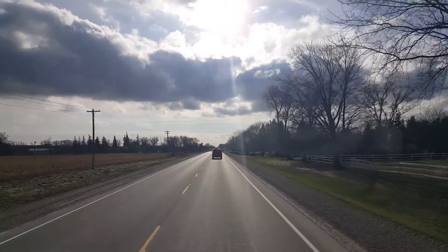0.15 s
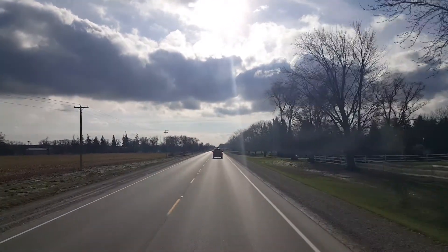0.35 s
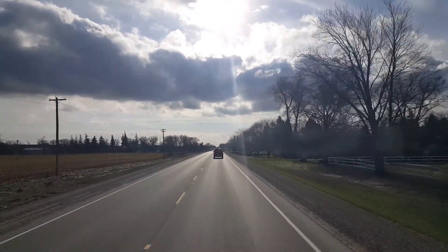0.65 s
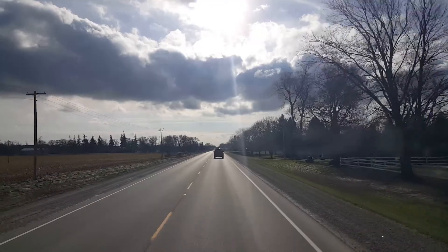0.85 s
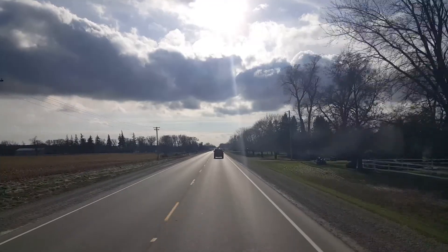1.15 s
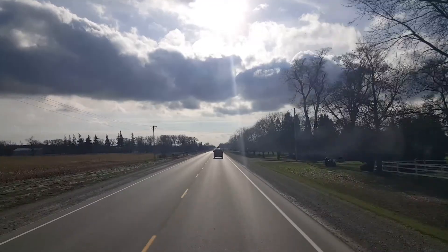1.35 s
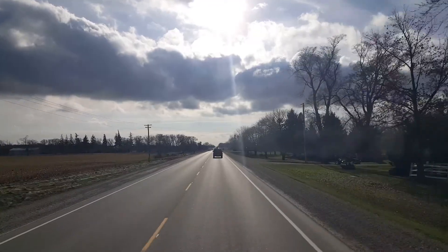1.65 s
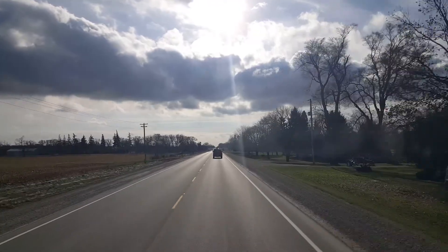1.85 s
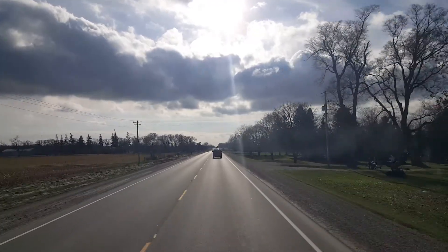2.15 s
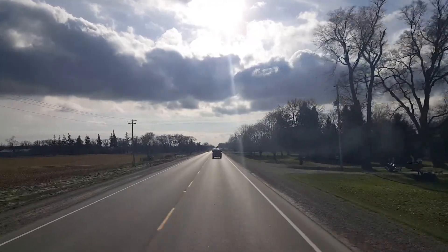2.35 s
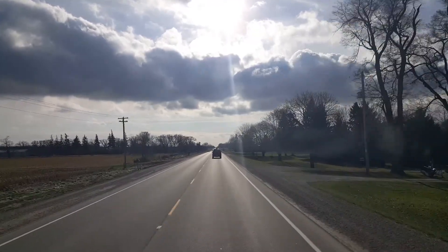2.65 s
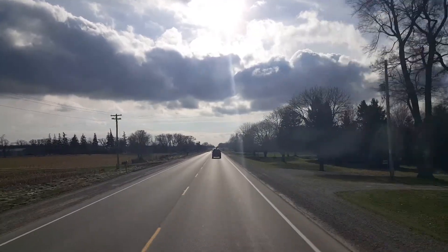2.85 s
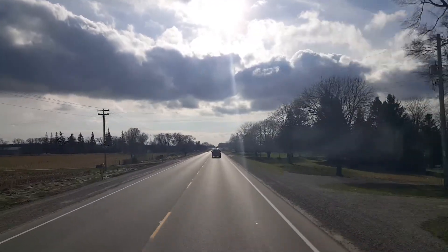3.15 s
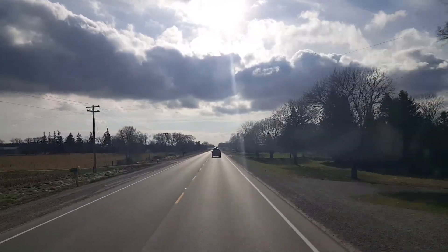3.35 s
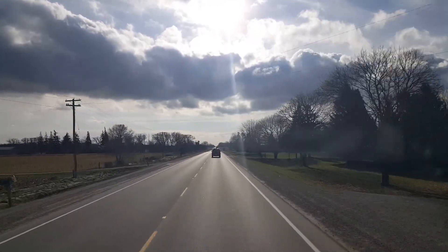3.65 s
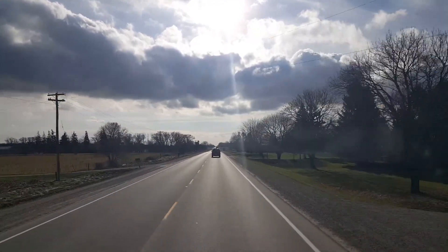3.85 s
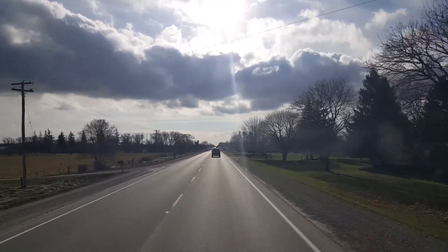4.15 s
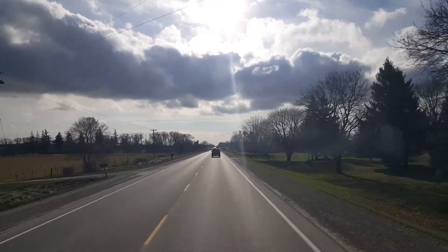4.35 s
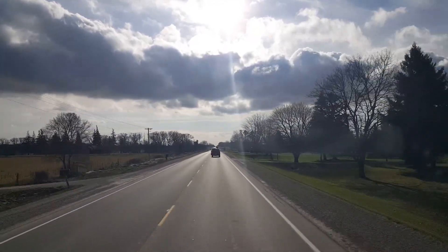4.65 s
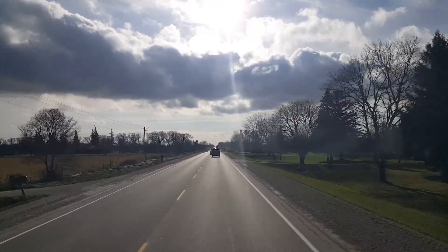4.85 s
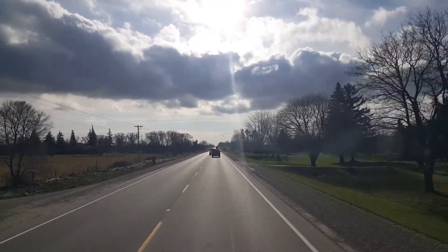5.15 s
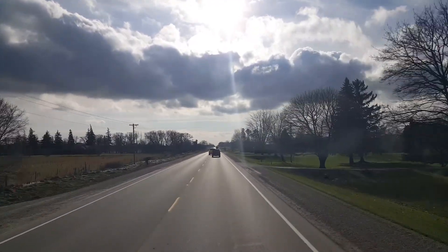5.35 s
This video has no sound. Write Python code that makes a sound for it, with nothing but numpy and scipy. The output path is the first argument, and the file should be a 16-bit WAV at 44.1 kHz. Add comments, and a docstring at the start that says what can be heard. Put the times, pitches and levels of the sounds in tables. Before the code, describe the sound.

Low booming diesel engine heard from the cab, with knock, hiss and tyre rumble; the throttle lifts midway and presses again near the end.

```python
"""One first hears the booming firing tone of a six-cylinder diesel pulling at low revs in a heavy truck's cab.
The driver lifts off for two seconds and presses on again; tone, knock and hiss sink and return with the pull.
Periodic sources are sums of sines locked to the crankshaft or gliding in pitch; combustion, tyre rumble and
panels are shaped noise. A faint turbocharger whistle and ticks of the trim lie over it.
Two microphones a hand apart hear a sound field whose likeness depends on frequency."""
import sys
import numpy as np
from scipy import signal
from scipy.fft import rfft, irfft, next_fast_len
from scipy.io import wavfile
from scipy.ndimage import map_coordinates

SR = 44100
rng = np.random.default_rng(int(sys.argv[2]) if len(sys.argv) > 2 else 0)


def generate_wav(sig):
    """Save sig (samples, or channels by samples) to the path in sys.argv[1] as 16-bit PCM at SR."""
    pcm = np.round(np.clip(np.atleast_2d(sig).T, -1, 1) * 32767).astype(np.int16)
    wavfile.write(sys.argv[1], SR, pcm)


N = 243431

# Level columns are nominal: the functions add swings and random wobble. A half_length_s runs from peak to 1/e.
# Crankshaft and pull: start_s, firing_rate_hz, load_db (below full pull)
CRANKSHAFT = [(0, 55.22, 1), (.9, 55.44, -2.5), (1.6, 55.62, -1), (2.3, 55.77, -1), (2.85, 55.78, -2.5),
              (3.05, 55.1, -7.5), (3.25, 55.09, -13.5), (4.1, 55.03, -10), (4.3, 55.05, -3.5),
              (4.75, 54.85, -12), (4.9, 55.05, -1), (5.52, 55, -2.5)]
# Multiples of the four-stroke cycle that stand out: order (6 = firing rate)
CYCLE_ORDERS = [3, 7, 8, 9, 10, 11, 13, 14, 21, 24, 27, 29, 30, 32, 33, 36, 39, 42, 44, 48, 51, 54, 57, 58,
                60, 63, 66, 69, 72, 74, 75, 78, 87, 90, 93, 96, 99, 105, 108, 114, 123, 126, 129, 147]
# Their strengths at full pull: level_db
CYCLE_ORDER_LEVELS = [-49, -32, -36, -26, -34, -31, -37, -36, -42, -41, -38, -43, -46, -44, -35, -42, -43,
                      -47, -42, -44, -48, -49, -47, -48, -48, -50, -46, -49, -46, -46, -47, -48, -50, -45,
                      -52, -53, -51, -52, -52, -53, -51, -51, -57, -58]
# Firing tone, following the pull on the engine mounts: start_s, level_db
FIRING_BOOM = [(0, -16.5), (.65, -23), (.8, -18.5), (1.3, -18), (2.9, -20), (3.05, -27), (3.2, -38),
               (4.12, -41), (4.25, -32.5), (4.78, -35.5), (4.87, -21.5), (5.15, -22.5), (5.52, -19.5)]
# Brief dips and swells of the low end: peak_s, firing_tone_db, thrum_db, rumble_db, onset_s
LOW_LURCHES = [(.09, -2, -9, 0, 0.051), (.26, -3.5, -1, -4, 0.047), (.34, 3.5, -0.5, -1.5, .04),
               (.4, -12.5, -1.5, -2.5, 0.054), (0.548, -2.5, -8, -3.5, 0.055), (.6, -4.5, 0.5, 0.5, 0.07),
               (.82, 1.5, 1.5, -1, 0.14), (1.209, -9.5, -4, -4, 0.18), (1.33, 1, 1, 1, 0.085),
               (1.44, -9.5, 0, -7, 0.029), (1.68, 2, 2, -1, 0.1), (1.772, -3, 0.5, -16.5, 0.018),
               (2.07, -12, -4.5, -9, .07), (2.115, 2, 4.5, 1, .025), (2.16, 1.5, 2, 0, .04),
               (2.21, -5.5, 0, -7, .025), (2.27, -12, -8, -0.5, .06), (2.68, -1, 3.5, -2.5, 0.11),
               (2.8, -4, -4, -2.5, 0.013), (2.98, 0.5, -1, -0.5, 0.027), (3.11, -1, 2, 4.5, 0.064),
               (3.24, -7.5, -3.5, 0.5, 0.027), (3.33, 2, -6, 2.5, 0.032), (3.55, -1, 0, 0.5, 0.071),
               (3.89, 11, 5.5, 4.5, 0.085), (3.95, -3, 0, -3.5, 0.039), (4.12, -10, 0.5, 2, 0.033),
               (4.32, 4, 9.5, 3, 0.047), (4.39, -1, -7, -2, 0.039), (4.47, 10, 3.5, 3, 0.044),
               (4.55, 0, 2.5, -5.5, 0.044), (5.08, -2.5, -4.5, -6, 0.018), (5.16, 2, 6.5, 2.5, 0.013),
               (5.29, 1, -2.5, 0, 0.053)]
# Injected fuel: start_s, level_db (below full)
INJECTED_FUEL = [(0, -1), (.4, -1.3), (1.8, -1.9), (2.885, -2.5), (2.905, -8), (3.05, -6.5), (3.36, -7),
                 (3.45, -7.5), (3.55, -7.5), (3.7, -6.5), (3.9, -10.5), (4.05, -8), (4.2, -6), (4.33, -6),
                 (4.46, -6.5), (4.56, -4.5), (4.66, -5), (4.76, -4), (4.84, -2.5), (5.52, -1.3)]
# Low roar of the engine block: start_s, level_db
BLOCK_ROAR = [(0, -34.5), (.45, -42), (1, -37.5), (2, -41.5), (2.83, -38.5), (3.2, -48.5), (4.1, -46.5),
              (4.27, -41), (4.76, -40.5), (4.93, -36), (5.52, -36.5)]
# Brief dips and swells of the knock: peak_s, change_db, half_length_s
KNOCK_CHANGES = [(.33, 1, .05), (.72, 1.7, .04), (3.437, -6.5, .05), (3.93, -1, .04), (4.72, -4.5, 0.033)]
# Pipes that ring: centre_hz, width_hz, level_db (against the intake hiss), share (of the block's swing)
RINGING_PIPES = [(3350, 130, -13, 0), (3575, 90, -17, .6), (3905, 100, -14, .9), (4025, 80, -14, .9),
                 (3950, 450, -12, .9), (4820, 90, -21, .3), (5140, 90, -24, .3), (5370, 90, -25, .3)]
# Swells and dips of that ringing: peak_s, change_db, half_length_s
PIPE_CHANGES = [(.2, 4, .05), (.52, -5, .06), (1.72, 6, .05), (1.87, -6, .04), (1.97, 5, .04),
                (2.35, -2, .05), (2.6, 3, .04)]
# Cab panels that sing: centre_hz, width_hz, level_db (at full pull), share (of the block's swing)
CAB_PANELS = [(407, 24, -43, 0.28), (649, 24, -41, 0.94), (686, 50, -42, 1.1), (807, 44, -44, 0.7),
              (1150, 51, -52, 1.3), (1309, 28, -54, 1.1), (1885, 60, -55.5, .9), (2055, 90, -54, .9),
              (2583, 90, -58.5, 1.1)]
# Short hums in the lull: peak_s, pitch_hz, level_db, half_length_s
LULL_HUMS = [(3.336, 368, -35.5, 0.046), (3.85, 805, -43, .045)]
# Narrow hiss climbing as the load returns: start_s, centre_hz, level_db
CLIMBING_HISS = [(4.1, 3330, -85), (4.22, 3330, -62), (4.38, 3350, -66), (4.46, 3550, -70),
                 (4.53, 3600, -63), (4.64, 3650, -63), (4.7, 3680, -67), (4.74, 3680, -58),
                 (4.785, 3720, -58), (4.81, 3960, -59), (4.87, 3960, -70), (4.93, 3950, -57),
                 (5.0, 3950, -85)]
# Turbocharger wheel spooling up and down: start_s, pitch_hz
TURBO_PITCH = [(0, 5420), (.4, 5930), (.65, 6160), (1, 6410), (1.5, 6610), (2, 6760), (2.7, 6650),
               (2.85, 6540), (3, 6270), (3.2, 5760), (3.46, 5340), (3.87, 4880), (4.1, 4730), (4.4, 4590),
               (4.75, 4570), (5.25, 5120), (5.52, 5480)]
# Swells of the turbocharger whistle: peak_s, level_db, half_length_s
WHISTLE_SWELLS = [(.1, -73, .08), (.38, -70, .06), (.55, -72, .06), (1.03, -70, .06), (1.38, -72, .1),
                  (1.48, -70, .03), (1.97, -71, .07), (2.2, -73, .12), (2.45, -72, .12), (2.7, -73, .08),
                  (2.86, -71, .04), (2.94, -72, .015), (3.0, -65.5, .022), (3.09, -70, .018),
                  (3.14, -72, .018), (3.22, -66.5, .025), (3.33, -70, .022), (3.455, -65, .025),
                  (3.5, -71, .02), (3.6, -72, .02), (3.84, -68.5, .035), (4.42, -65.5, .035),
                  (4.495, -65, .045), (4.665, -65, .04), (5.22, -70, .04), (5.42, -63, .03)]
# Dry trim ticks: start_s, treble_db, left_minus_right_db, length_s, body_db (against the treble), rise_s
TRIM_TICKS = [(.447, -71, 1, .02, 0, .008), (.733, -68.5, 1, .025, 0, .01), (1.612, -68, -1, .022, 0, .01),
              (3.435, -70.5, 0, .018, 0, .006), (3.82, -71, 0, .008, 6, .002),
              (3.9795, -62, 4, .02, 20.5, .0006), (4.495, -70, 0, .01, 6, .002),
              (4.625, -68.5, .5, .025, 0, .01), (4.925, -72, 1.5, .02, 2, .008),
              (5.065, -72, 1.5, .02, 2, .008), (5.325, -72, 0, .02, 2, .008)]

# Relative noise spectra of the combustion layers: frequency_hz, density_db (per Hz)
ROAR_SPECTRUM = [(700, -39.5), (880, 1), (930, -5.5), (1010, -2.5), (1100, -2.5), (1150, -8.5),
                 (1200, -2.5), (1240, -12.5), (1500, -64.5), (2700, -120)]
KNOCK_SPECTRUM = [(900, -54.5), (1200, -3), (1310, 3), (1400, 1.5), (1520, 1), (2100, -1.5), (2410, -6.5),
                  (2580, -4.5), (2840, -16.5), (3100, -11), (4030, -35.5), (6820, -120)]
HISS_SPECTRUM = [(2000, -41.5), (2800, 1), (3100, -5.5), (3600, -3), (4100, -6.5), (4500, -6), (5000, -12),
                 (5600, -29), (9000, -120)]
FIZZ_SPECTRUM = [(3000, -63), (4600, -8), (5200, 0.5), (5800, -2), (7000, -5), (8000, -9), (8800, -12),
                 (9300, -28.5), (10000, -33.5), (14000, -120)]
# Relative spectra of chassis thrum, tyre and floor rumble, cab drone: frequency_hz, density_db (per Hz)
THRUM_SPECTRUM = [(15, -40), (28, -20), (40, -14), (50, -16), (60, -12), (70, -3), (88, -1), (115, -1),
                  (140, -4), (165, -38), (310, -120)]
RUMBLE_SPECTRUM = [(76, -39), (130, -3), (156, -1), (194, -2), (232, -6.5), (263, -3.5), (370, -12),
                   (480, -36.5), (810, -120)]
DRONE_SPECTRUM = [(200, -35), (340, -10), (360, -2), (471, -3), (505, -6), (612, -6.5), (670, -3),
                  (750, -10), (782, -3), (854, -11.5), (920, -7.5), (1200, -32.5), (2020, -120)]
# Relative spectra of tick treble, tick body and moving air: frequency_hz, density_db (per Hz)
TICK_TREBLE_SPECTRUM = [(5000, -40), (8500, -3), (10500, -4), (13000, -1), (15800, -4)]
TICK_BODY_SPECTRUM = [(800, -56), (1500, 9.5), (2200, 10.5), (3500, -0.5), (5000, -5), (8000, -4),
                      (9500, -12.5), (14000, -60)]
AIR_SPECTRUM = [(5000, -30), (7000, 6), (8700, 9), (9400, 3), (10200, 0), (12000, -1), (15900, -2.5)]

# Left-right likeness of sound from all sides, opposed near a half wave of the spacing:
# frequency_hz, correlation (-1 to 1)
LIKENESS = [(60, 1), (110, 0.88), (200, 0.76), (350, 0.91), (550, 0.055), (800, 0.35), (1020, -0.11),
            (1300, -0.6), (1750, -0.01), (2200, 0.22), (3000, .05), (12000, -0.058)]
# Colour difference of left and right: frequency_hz, left_minus_right_db
STEREO_LEAN = [(60, 0.8), (300, -1), (520, 1), (700, -0.4), (1200, 3.5), (2100, 1), (2900, -0.5),
               (6500, -0.5), (7800, -1), (9000, 4), (10500, 1), (15000, 0)]

FULL_BOOM_DB, FULL_BLOCK_DB = -21.5, -37  # firing tone and block roar at full pull
BEAT_DB, BEAT_RAD = 3, .3  # the firing tone beats once per four-stroke cycle
# Reference level at full pull (dB), share of the boom's swing
THRUM_LAW, RUMBLE_LAW, DRONE_LAW = (-19.5, 0.4), (-26, 0.3), (-31, 0.2)
# Reference level at full fuel (dB), share of the fuel's swing, lag (s)
KNOCK_LAW, HISS_LAW, FIZZ_LAW = (-39, 0.79, 0.054), (-48, 1.07, .002), (-57, 1.38, .002)
RECOVER_S, TONE_LAG_S = 0.028, 0.023  # decay of a lurch; delay of the firing tone's answer to it
DRONE_LURCH, PANEL_LURCH = 0.69, 0.49  # shares of the rumble's and of the thrum's lurches
WHISTLE_FLOOR_DB = -81  # nominal whistle level between swells
CLIMB_WIDTH_HZ = 160  # width of the climbing hiss
TOP_HZ = 15760  # highest frequency kept


def orders():
    """Harmonics of a periodic source: a firing tone plus cycle orders from unequal cylinders."""
    angle, load_db = cycle(), curves(CRANKSHAFT)[1]
    boom_db, thrum_db = shake()[:2]
    surge_db = thrum_db - THRUM_LAW[0]  # the orders, low ones most, ride on the chassis thrum
    beat_db = BEAT_DB * np.cos(angle + BEAT_RAD)
    boom_size = np.sqrt(2) * amp(boom_db + beat_db + 0.37 * wobble(16))
    out = boom_size * np.sin(6 * angle + 0.049 * wobble(26)) * np.ones((2, 1))
    for order, db in zip(CYCLE_ORDERS, CYCLE_ORDER_LEVELS):
        apart = field_angle(order * CRANKSHAFT[0][1] / 6)
        jitter = .25 * wobble(4) + .006 * order * wobble(14)
        phase = order * angle + rng.uniform(0, 2 * np.pi) + jitter
        drive_db = surge_db + .5 * load_db if order < 15 else load_db + .4 * surge_db
        flutter_db = (1.0 if order < 40 else 3.0) * wobble(3.524)
        size = np.sqrt(2) * amp(db + drive_db + flutter_db) / max(np.cos(apart), .4)
        # opposite phase shifts at the two microphones
        out += size * np.sin(phase + np.array([[-apart], [apart]]))
    return out


def combustion():
    """Amplitude modulation of noise: knock, hiss and fizz swell with unequal firings while the engine pulls."""
    angle, load_db = cycle(), curves(CRANKSHAFT)[1]
    pull = amp(load_db)
    firing = np.cos(6 * angle)
    bank = np.cos(3 * angle)
    whole = np.cos(angle) + np.cos(4 * angle + 1)
    flutter = wobble(13)

    knock_swing = pull * (0.54 * firing + 0.57 * bank + 0.52 * whole)
    hiss_swing = pull * (1.5 * firing + 1.2 * bank + 0.15 * whole)
    fizz_swing = pull * (0.71 * firing + 1.1 * bank + 1.3 * whole)
    roar = rush(shaped(ROAR_SPECTRUM), amp(1.36 * wobble(19)))
    knock = rush(shaped(KNOCK_SPECTRUM), amp(knock_swing + 0.67 * wobble(14)))
    hiss = rush(shaped(HISS_SPECTRUM), amp(hiss_swing + flutter))
    fizz = rush(shaped(FIZZ_SPECTRUM), amp(fizz_swing + 0.45 * flutter))

    hiss_db = burn(*HISS_LAW)
    out = amp(curves(BLOCK_ROAR)[0]) * roar
    out += amp(burn(*KNOCK_LAW) + swells(KNOCK_CHANGES)) * knock
    out += amp(hiss_db - 2.0) * hiss
    out += amp(burn(*FIZZ_LAW)) * fizz
    out += amp(hiss_db + swells(PIPE_CHANGES)) * pipes()
    return out


def pipes():
    """Resonance: each pipe passes a narrow band of noise, its level partly following the block roar."""
    swing_db = block_swing()
    out = np.zeros((2, N))
    for hz, width_hz, db, share in RINGING_PIPES:
        out += amp(db + share * swing_db + 2.8 * wobble(22)) * rush(peak(hz, width_hz))
    return out


def road():
    """Structure-borne noise: chassis thrum, tyre and floor rumble, and cab drone in irregular lumps."""
    thrum_db, rumble_db, drone_db = shake()[1:]
    load_db = curves(CRANKSHAFT)[1]
    thrum = rush(shaped(THRUM_SPECTRUM), amp(0.55 * wobble(3.4)))
    rumble = rush(shaped(RUMBLE_SPECTRUM), amp(0.58 * wobble(18)))
    drone = rush(shaped(DRONE_SPECTRUM), amp(.8 * wobble(16)))
    return amp(thrum_db - 7.5 - 0.28 * load_db) * thrum + amp(rumble_db) * rumble + amp(drone_db) * drone


def panels():
    """Plate resonance: cab panels sing in narrow noise bands of irregular level."""
    swing_db = block_swing()
    lurch_db = PANEL_LURCH * lurches()[1]
    out = np.zeros((2, N))
    for hz, width_hz, db, share in CAB_PANELS:
        flutter_db = 1.6 * wobble(5.77) + 2.2 * wobble(13)
        out += amp(db + share * swing_db + lurch_db + flutter_db) * rush(peak(hz, width_hz))
    return out


def hums():
    """Tone bursts: a sine under a Gaussian envelope swells and fades."""
    t = np.arange(N) / SR
    out = np.zeros(N)
    for s, hz, db, half_s in LULL_HUMS:
        tone = np.sin(2 * np.pi * hz * t + 0.28 * wobble(16))
        out += np.sqrt(2) * amp(db) * bump(s, half_s) * tone
    return out


def climb():
    """Quadrature modulation: low-frequency noise is carried up to a rising centre frequency."""
    hz, db = curves(CLIMBING_HISS)
    angle = 2 * np.pi * np.cumsum(hz) / SR
    slow = filtered(rng.standard_normal((2, 2, N)), peak(0, CLIMB_WIDTH_HZ))
    band = slow[0] * np.cos(angle) + slow[1] * np.sin(angle)
    return amp(db + 3.5) * band / np.sqrt(np.mean(band ** 2))


def turbo():
    """Frequency modulation: a thin whistle follows the turbocharger's pitch and swells in bursts."""
    hz = curves(TURBO_PITCH)[0]
    size = amp(WHISTLE_FLOOR_DB) + sum(amp(db) * bump(s, half_s) for s, db, half_s in WHISTLE_SWELLS)
    phase = 2 * np.pi * np.cumsum(hz * (1 + .0012 * wobble(30))) / SR
    apart = .6  # phase shift in radians, opposite at the two microphones
    tone = np.sin(phase + np.array([[apart], [-apart]])) / np.cos(apart)
    return np.sqrt(2) * size * amp(1.2 * wobble(40)) * tone


def ticks():
    """Transient envelopes on grainy noise: each dry scrape has its own rise, a quick end and a short ring."""
    t, treble, body = np.arange(N) / SR, np.zeros((2, N)), np.zeros((2, N))
    for s, db, pan_db, length_s, body_db, rise_s in TRIM_TICKS:
        u = np.clip((t - s) / length_s, 0, 9)
        rise = 1 - np.exp(-u * length_s / rise_s)
        fall = np.exp(-u ** 2.2) + 0.53 * np.exp(-1.3 * u)  # quick end plus ring of the cab
        gate = amp(db + np.array([[pan_db], [-pan_db]]) / 2) * rise * fall
        treble += gate
        body += amp(body_db) * gate
    grain = amp(1.8 * wobble(400))
    return treble * rush(shaped(TICK_TREBLE_SPECTRUM), grain) + body * rush(shaped(TICK_BODY_SPECTRUM), grain)


def air():
    """Broadband flow noise: the faint treble of moving air follows the load slightly."""
    flutter = amp(.5 * wobble(26) + 0.84 * wobble(40))
    return amp(-67.0 + 0.18 * curves(CRANKSHAFT)[1]) * rush(shaped(AIR_SPECTRUM), flutter)


def cycle():
    """Phase as the integral of frequency: angle of the four-stroke cycle (six firings) in radians."""
    return 2 * np.pi * np.cumsum(curves(CRANKSHAFT)[0]) / (6 * SR)


def lurches():
    """Two-sided Gaussian envelopes: brief level changes in dB of firing tone, thrum and rumble."""
    t = np.arange(0, N, 64) / SR  # a coarse time grid is enough
    s, *changes_db, onset_s = np.transpose(LOW_LURCHES)
    u = t[:, None] - s
    bell = np.exp(-(u / np.where(u < 0, onset_s, RECOVER_S)) ** 2)
    lags_s = (TONE_LAG_S, 0, 0)
    return [np.interp(np.arange(N) / SR - lag_s, t, bell @ db) for db, lag_s in zip(changes_db, lags_s)]


def shake():
    """Common excitation: levels in dB of firing tone, thrum, rumble and drone share the boom's swing."""
    boom_db = curves(FIRING_BOOM)[0]
    tone, thrum, rumble = lurches()
    law = lambda db, share: db + share * (boom_db - FULL_BOOM_DB)
    drone_db = law(*DRONE_LAW) + DRONE_LURCH * rumble
    return boom_db + tone, law(*THRUM_LAW) + thrum, law(*RUMBLE_LAW) + rumble, drone_db


def burn(db, share, lag_s):
    """First-order lag: level in dB of a layer that follows the injected fuel."""
    keep = np.exp(-1 / (max(lag_s, .001) * SR))
    return db + share * signal.lfilter([1 - keep], [1, -keep], curves(INJECTED_FUEL)[0])


def block_swing():
    """Level difference: block roar in dB against its level at full pull."""
    return curves(BLOCK_ROAR)[0] - FULL_BLOCK_DB


def bump(s, half_s):
    """Gaussian envelope: peak 1 at s seconds, falling to 1/e after half_s."""
    return np.exp(-((np.arange(N) / SR - s) / half_s) ** 2)


def swells(rows):
    """Addition of levels: the sum in dB of Gaussian swells and dips."""
    return sum(db * bump(s, half_s) for s, db, half_s in rows)


def field_angle(hz):
    """Spatial correlation: the angle whose double has the left-right likeness as its cosine."""
    return np.arccos(np.clip(along(LIKENESS, hz), -1, 1)) / 2


def rush(gain, gate=1):
    """Partly correlated sound field: gated stereo noise, scaled by the rms of its mid signal."""
    def response(hz):
        turn = field_angle(hz)
        return gain(hz) * [np.cos(turn), np.sin(turn)]
    mid, side = filtered(gate * rng.standard_normal((2, N)), response)
    return np.array([mid + side, mid - side]) / np.sqrt(np.mean(mid ** 2))


def shaped(spectrum):
    """Spectral shaping: gain function of a spectrum table."""
    return lambda hz: amp(along(spectrum, hz))


def peak(hz, width_hz):
    """Resonance curve: Lorentzian gain, half its peak at the edges of the width."""
    return lambda f: 1 / (1 + ((f - hz) / (width_hz / 2)) ** 2)


def filtered(x, response):
    """Convolution theorem: multiply the spectrum of x by a frequency response."""
    m = next_fast_len(N + 8192)
    return irfft(rfft(x, m) * response(np.fft.rfftfreq(m, 1 / SR)), m)[..., :N]


def wobble(rate):
    """Band-limited fluctuation: a smooth random curve with rate knots a second."""
    knots = rng.standard_normal(int(N * rate / SR) + 4)
    return map_coordinates(knots, [np.arange(N) * rate / SR])


def curves(rows):
    """Linear interpolation in time: one value per sample for each column after the time."""
    s, *columns = np.transpose(rows)
    return [np.interp(np.arange(N) / SR, s, column) for column in columns]


def along(points, hz):
    """Interpolation on a logarithmic frequency axis."""
    f, v = np.transpose(points)
    return np.interp(np.log(hz + 1), np.log(f + 1), v)


def amp(db):
    """Decibel law: amplitude gain of a level in dB."""
    return 10 ** (np.asarray(db) / 20)


def scene():
    """Superposition: the pressures of all sources add."""
    engine = orders() + combustion()
    cab = road() + panels()
    return engine + cab + hums() + climb() + turbo() + ticks() + air()


def record(dry):
    """Stereo colour: left and right differ in tone; the treble ends at TOP_HZ."""
    sides = np.array([[1], [-1]])
    return filtered(dry, lambda hz: amp(along(STEREO_LEAN, hz) / 2 * sides) * (hz < TOP_HZ))


dry = scene()
out = record(dry)
generate_wav(out)
```